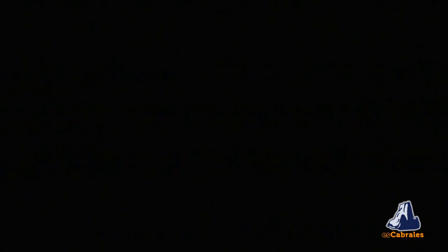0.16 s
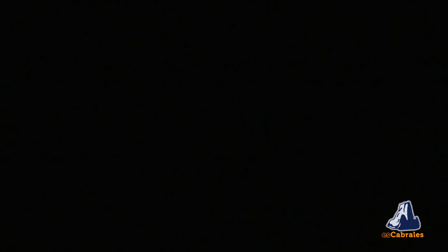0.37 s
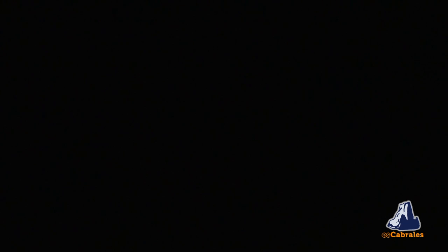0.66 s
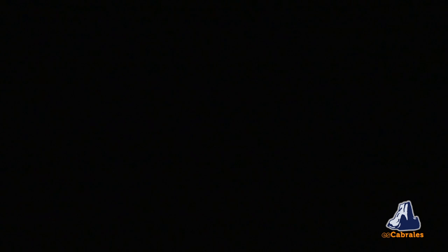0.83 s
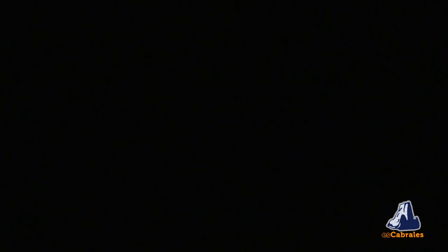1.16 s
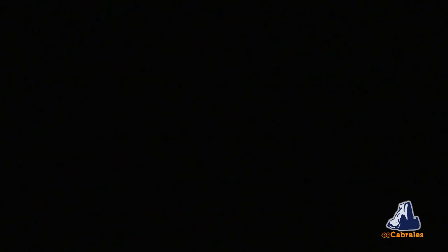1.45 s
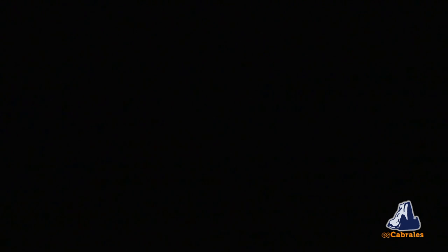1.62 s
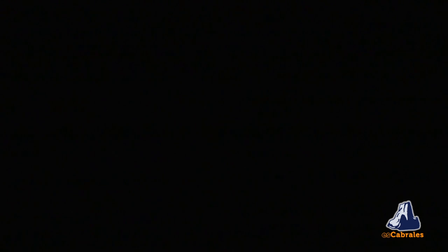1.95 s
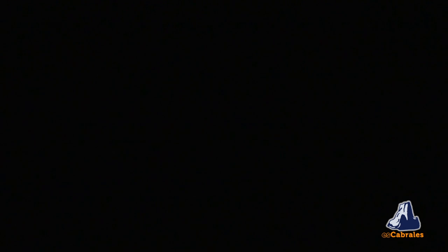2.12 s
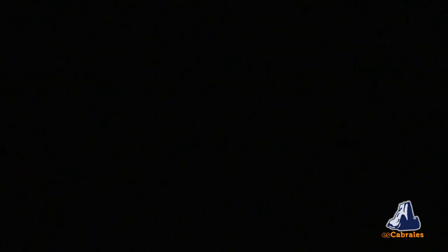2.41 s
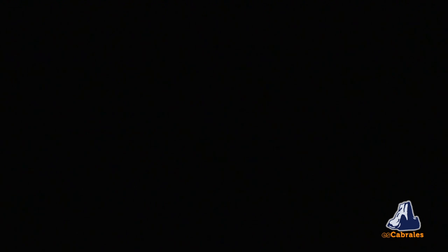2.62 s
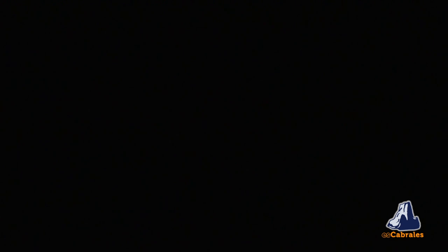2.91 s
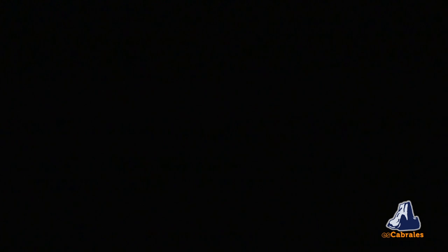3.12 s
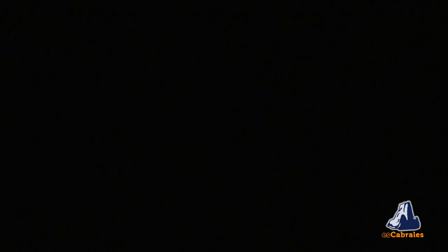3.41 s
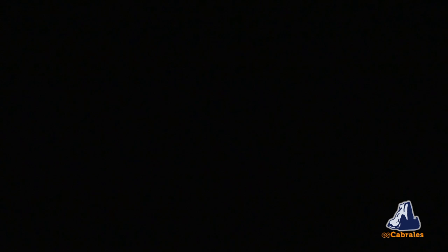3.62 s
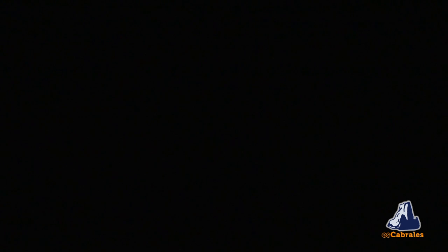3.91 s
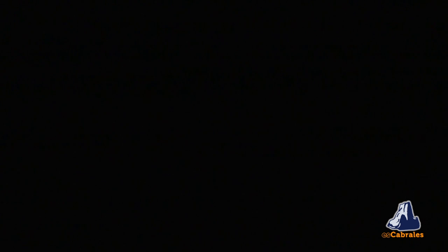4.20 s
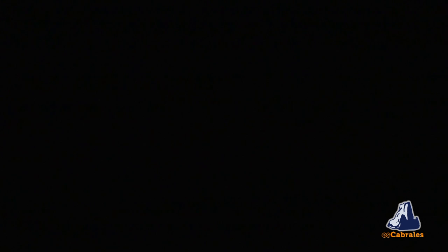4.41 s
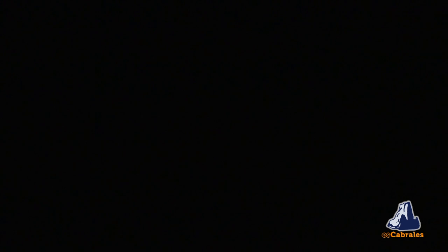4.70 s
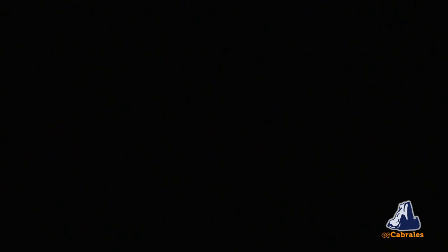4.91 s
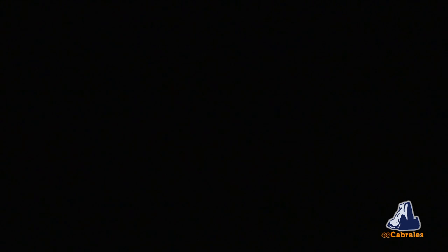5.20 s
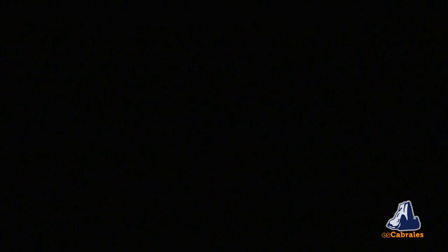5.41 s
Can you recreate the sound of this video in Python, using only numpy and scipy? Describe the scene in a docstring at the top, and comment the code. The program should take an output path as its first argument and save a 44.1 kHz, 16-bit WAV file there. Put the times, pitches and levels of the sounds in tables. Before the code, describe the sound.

Night storm in a yard: rolling distant thunder, then stronger booming thunderclaps over light pattering rain, small plops and faint squeaks.

```python
"""In a yard in steady rain, thunder rolls: a far rumble dies away, then loud claps break and keep rolling.
The rain is a shaped noise wash plus a patter of random clicks with short sprays; big drops splash as
noise bursts or plop as ringing bubbles, and a small animal squeaks faintly as thin, sliding sines.
The thunder is clusters of small shocks swelling in surges, with N-shaped pressure waves for the claps.
The right microphone channel is much louder than the left and hisses in the top treble."""
import sys
import numpy as np
from scipy import signal
from scipy.fft import rfft, irfft
from scipy.io import wavfile
from scipy.ndimage import uniform_filter1d

SR = 44100
rng = np.random.default_rng(int(sys.argv[2]) if len(sys.argv) > 2 else 0)


def inscribe(sig):
    """Save sig as 16-bit PCM at rate SR to the path in sys.argv[1].

    A 1-D sig is mono; a 2-D sig holds one channel per row.
    Samples are clipped to [-1, 1] before scaling.
    """
    pcm = np.round(np.clip(np.atleast_2d(sig).T, -1, 1) * 32767)
    wavfile.write(sys.argv[1], SR, pcm.astype(np.int16))


N = 244755
TIME = np.arange(N) / SR
FREQS = np.fft.rfftfreq(N, 1 / SR)


def gain_of(db):
    """Decibels to amplitude."""
    return 10 ** (np.asarray(db) / 20)


def evened(x):
    """Scales a sound to rms 1."""
    return x / np.sqrt(np.mean(x ** 2) + 1e-20)


def read(points, hz=FREQS):
    """Reads a table of points on a log-frequency axis."""
    f, value = np.transpose(points)
    return np.interp(np.log(hz + 1), np.log(f + 1), value)


def add(mix, s, sound):
    """Mixes a sound of several channels in at time s."""
    part = mix[:, max(round(s * SR), 0):][:, :sound.shape[1]]
    part += sound[:, :part.shape[1]]


def white():
    """Spectrum of fresh white noise."""
    return rfft(rng.standard_normal(N))


def wander(size):
    """Slow random drift of rms 1: noise smoothed twice over size samples."""
    once = uniform_filter1d(rng.standard_normal(N), size, mode="wrap")
    return evened(uniform_filter1d(once, size, mode="wrap"))


def scatter(per_s, spread_db):
    """Clicks of either sign at random moments, most small and a few large."""
    hit = rng.random(N) < per_s / SR
    sign = rng.choice([-1, 1], N)
    size_db = spread_db * np.minimum(rng.exponential(1, N), 4)
    return evened(hit * sign * gain_of(size_db))


def below(edge_hz):
    """Gain of a steep low-pass."""
    return 1 / (1 + (FREQS / edge_hz) ** 12)


def pair(near, other, same, balance, phase=0):
    """Left and right spectra: the left shares only a part of what the right hears."""
    likeness = np.clip(read(same), -1, 1)
    left = likeness * near * np.exp(1j * phase) + np.sqrt(1 - likeness ** 2) * other
    return np.array([left * gain_of(read(balance)), near])


def reflected(sound, wet, t60=0.079):
    """The direct sound and a short tail from nearby walls, different in each channel."""
    t = TIME[:4000]
    tail = rng.standard_normal((2, len(t))) * gain_of(-60 * t / t60)
    tail *= wet / np.linalg.norm(tail[0])
    tail[:, 0] = 1
    return signal.fftconvolve(sound[None], tail, axes=1)


# Colour of the distant rain's wash. Each row: frequency in Hz, relative level per Hz in dB.
WASH_COLOUR = [(30, 13), (300, 20), (900, 6.5), (1500, -0.5), (2100, -4), (3200, -6.5), (5000, -8.5),
               (7000, -9), (9000, -14.5), (12000, -21), (15500, -26)]
# Stereo tilt of the rain. Each row: frequency in Hz, left minus right in dB.
RAIN_BALANCE = [(300, -27), (1200, -3), (2200, -1.5), (3200, -1.5), (6000, -6.5), (9000, -5), (15000, -10)]
# How alike the rain is in both channels. Each row: frequency in Hz, likeness from 0 to 1.
RAIN_LIKENESS = [(300, 0.64), (1500, 0.23), (4000, 0.26), (9000, 0.24)]
RAIN_DB = -57.5  # the level the whole shower hovers around


def rain(wash_db=0, patter_db=-8, patter_hz=5800, tail_db=-21, tail_t60=0.063, swell_db=0.54):
    """A smooth wash of far drops, and the patter of nearer ones, each with a short spray."""
    wash = pair(white(), white(), RAIN_LIKENESS, RAIN_BALANCE) * gain_of(read(WASH_COLOUR))
    # the band from 2500 to 6500 Hz sets the level of the wash
    wash /= irfft(wash.mean(0) * (below(6500) - below(2500)), N).std()
    t = TIME[:2000]
    drops = np.zeros((2, len(FREQS)), complex)
    # leaves, soil and puddles each answer in a range of their own
    for centre_hz in patter_hz * np.geomspace(.5, 1.5, num=6):
        spray = gain_of(tail_db - 60 * t / tail_t60) * rng.standard_normal((2, len(t)))
        spray[:, 0] = 1  # the hit itself
        clicks = [rfft(scatter(per_s=30, spread_db=3.5)) for _ in range(2)]
        hits = pair(*clicks, RAIN_LIKENESS, RAIN_BALANCE)
        answer = np.exp(-(np.log((FREQS + 1) / centre_hz) / .27) ** 2)
        drops += hits * rfft(spray, N) * answer
    level = gain_of(RAIN_DB + swell_db * wander(size=3500))  # the fall thickens and thins
    patter = evened(irfft(drops, N))
    return level * (gain_of(wash_db) * irfft(wash, N) + gain_of(patter_db) * patter)


# Thin squeaks. Each row: start in seconds, length in seconds, pitch at the start in Hz,
# in the middle in Hz, at the end in Hz, level in dB.
SQUEAK_CALLS = [(2.095, .04, 7450, 7350, 7300, -54), (4.427, .055, 6900, 7100, 7300, -54),
                (4.540, .048, 8600, 9050, 8600, -54), (4.660, .068, 9050, 9380, 8600, -55),
                (4.817, 0.13, 7370, 7340, 7200, -51.5), (4.99, 0.041, 8550, 8600, 8850, -56),
                (5.043, .022, 9700, 9950, 10250, -53.5), (5.083, 0.055, 10150, 9900, 9100, -53),
                (5.124, .042, 8450, 8000, 7300, -57)]


def squeaks(left_db=-10, waver=0.0086, flutter_db=3, wet=0.54):
    """Thin, unsteady whistles, each sliding along one arch of pitch."""
    out = np.zeros((2, N))
    for s, length, start_hz, middle_hz, end_hz, db in SQUEAK_CALLS:
        u = np.linspace(0, 1, int(length * SR))
        arch = np.polyfit([0, .5, 1], [start_hz, middle_hz, end_hz], 2)
        hz = np.polyval(arch, u)
        hz *= 1 + waver * wander(size=100)[:len(u)]
        flutter = gain_of(flutter_db * wander(size=200)[:len(u)])
        strength = signal.windows.tukey(len(u), .5) * flutter
        whistle = np.sin(2 * np.pi * np.cumsum(hz) / SR) * strength
        add(out, s, gain_of(db) * gain_of([[left_db], [0]]) * reflected(whistle, wet))
    return out


# Drops that plop into standing water. Each row: start in seconds, pitch in Hz, level in dB.
PLOP_DROPS = [(0.751, 1700, -38.5), (1.993, 1730, -41), (3.232, 1700, -45), (4.461, 1720, -39),
              (5.288, 1670, -44)]


def plops(left_db=-8, glide=0.32, wet=1.0):
    """A trapped bubble rings for a moment, rising slightly in pitch, blurred by reflections."""
    out, t = np.zeros((2, N)), TIME[:5000]
    t60 = .08  # ring time of the bubble in seconds
    for s, hz, db in PLOP_DROPS:
        onset = 1 - np.exp(-t / 0.00046)
        ring = np.sin(2 * np.pi * hz * (t + glide * t ** 2))
        bubble = ring * onset * gain_of(db - 60 * t / t60)
        add(out, s, gain_of([[left_db], [0]]) * reflected(bubble, wet))
    return out


# smaller splashes land at random, with a spread of strength and colour
SMALL_DB, SMALL_SPREAD_DB = -49.5, 2.5
SMALL_HZ, SMALL_SPREAD_OCTAVES, SMALL_WIDTH = 5800, 0.49, .58  # width in natural log of frequency


def small_splashes(count=24):
    """Rows like those of the big splashes, strewn by chance over the whole shower."""
    when, strength, colour = rng.uniform(-1, 1, (count, 3)).T
    s = (np.arange(count) + (when + 1) / 2) * N / SR / count
    db = SMALL_DB + SMALL_SPREAD_DB * strength
    centre_hz = SMALL_HZ * 2 ** (SMALL_SPREAD_OCTAVES * colour)
    return list(zip(s, db, centre_hz, np.full(count, SMALL_WIDTH)))


# Big splashes close by. Each row: start in seconds, level in dB, centre of the spray in Hz,
# its width in natural log of frequency.
BIG_SPLASHES = [(0.047, -42, 7160, 0.42), (0.163, -43, 5440, 0.25), (0.207, -46, 6930, .5),
                (0.326, -46, 4750, 0.42), (0.841, -45.5, 7310, .56), (0.997, -43, 5500, .5),
                (1.326, -42, 6600, .6), (1.338, -43, 6800, .7), (1.641, -43.5, 6410, .46),
                (1.9895, -40, 6800, 0.28), (2.467, -46, 3710, .9), (2.682, -45, 5500, .5),
                (3.021, -45.5, 7080, .5), (3.514, -44.5, 5400, .5), (3.602, -46, 4190, 0.96),
                (3.925, -42, 8600, 0.61), (4.359, -46, 4550, 0.74), (4.976, -40, 6400, 0.74),
                (5.284, -45.5, 5740, 0.62)]


def splashes(left_db=-7, tail_db=-14, tail_s=0.021, grain_db=1.0, ring_db=3.0, sheen_db=-8, top_hz=14500):
    """A drop bursts into a brief spray of droplets, coloured by the spot where it lands."""
    out, t = np.zeros((2, N)), TIME[:4096]
    hz = np.fft.rfftfreq(len(t), 1 / SR)
    peak_s = .006
    # the crown bursts, then its droplets fall back
    burst = t / peak_s * np.exp(1 - t / peak_s)
    fallback = gain_of(tail_db) * t / tail_s * np.exp(1 - t / tail_s)
    shape = np.sqrt(burst ** 2 + fallback ** 2)
    for s, db, centre_hz, width in BIG_SPLASHES + small_splashes():
        fizz = rng.standard_normal((2, len(t)))
        fizz[0] += .5 * fizz[1]  # the left shares part of the right
        spot = gain_of(ring_db * evened(uniform_filter1d(rng.standard_normal(len(hz)), size=45)))
        hump = 1 / (1 + (np.log((hz + 1) / centre_hz) / width) ** 2)
        colour = spot * (hump + gain_of(sheen_db)) / (1 + (hz / top_hz) ** 10)
        grain = evened(uniform_filter1d(rng.standard_normal(len(t)), size=70))
        spray = irfft(rfft(fizz) * colour) * gain_of(grain_db * grain) * shape
        spray *= np.linalg.norm(shape) / np.linalg.norm(spray[1])  # the drop's size alone sets the energy
        add(out, s, gain_of(db) * gain_of([[left_db], [0]]) * spray)
    return out


# Stereo tilt of the thunder. Each row: frequency in Hz, left minus right in dB.
PEAL_BALANCE = [(60, -17), (110, -28), (200, -18.5), (380, -15.5), (700, -9.5), (1290, -14), (2400, -15)]
# How alike the thunder is in both channels. Each row: frequency in Hz, likeness from 0 to 1.
PEAL_LIKENESS = [(25, .3), (70, 0.33), (115, 0.83), (450, 0.47), (600, 0.15), (950, 0.42), (1400, 0.46)]
# Phase of the part both channels share. Each row: frequency in Hz, lead of the left in radians.
PEAL_PHASE = [(40, -0.29), (150, -0.11), (480, -0.92), (600, 1), (950, -1.4), (1500, 0.18)]


def thunder_pair(near, other):
    """Thunder as it reaches the two channels."""
    return pair(near, other, PEAL_LIKENESS, PEAL_BALANCE, read(PEAL_PHASE))


# Surges, each from one stretch of the lightning channel. Each row: arrival in seconds, level in dB,
# hold in seconds, depth in dB (more boom and less edge).
CHANNEL_SURGES = [(.25, -35.5, 0.073, 3), (0.496, -36.5, 0.017, -4.5), (.73, -38, 0.17, -9),
                  (0.902, -32, 0.25, -7), (1.389, -29.5, .04, -3.5), (2.326, -35.5, 0.13, 14.5),
                  (2.499, -20, 0.06, 1.5), (2.575, -18, 0.12, 0.5), (2.703, -22.5, 0.11, 3),
                  (2.884, -30, .02, 10), (3.124, -31.5, 0.16, 0.5), (3.39, -29, .01, 1),
                  (3.548, -20, 0.042, 2.5), (3.654, -29, 0.017, 7), (3.939, -30, 0.11, -.5),
                  (4.197, -29, .06, 2), (4.288, -25.5, .2, 1), (4.565, -31.5, 0.14, -0.5),
                  (4.787, -30.5, 0.11, -2.5), (5.124, -32, 0.052, 0.5), (5.469, -26, .1, 11.5)]
# How a surge sounds in the boom, body, roar and crackling edge. Each row: level in dB,
# fall in dB per second, dB gained per dB of depth.
SURGE_REGISTERS = [(-4, 176, 1), (0.5, 82, 0), (-5, 35.5, -0.81), (-16.5, 46, -.94)]
SURGE_RISE_S = 0.035


def surge_power():
    """Power in each register: a surge rises, holds and dies away, its boom fastest and its roar slowest."""
    level_db, fall_db_per_s, depth_share = np.transpose(SURGE_REGISTERS)[:, :, None]
    power, t = np.zeros((len(SURGE_REGISTERS), N)), TIME[:SR]
    rise = np.minimum(t / SURGE_RISE_S, 1)
    for s, db, hold_s, depth_db in CHANNEL_SURGES:
        fall_db = fall_db_per_s * np.maximum(t - SURGE_RISE_S - hold_s, 0)
        strength = rise * gain_of(db + level_db + depth_share * depth_db - fall_db)
        add(power, s, strength ** 2)
    return power


# Resonances of the yard that colour every peal. Each row: frequency in Hz, width in Hz, lift in dB.
YARD_RESONANCES = [(162, 16, 2), (222, 13, 2), (258, 17, -0.5), (287.5, 25, 6.5), (303, 12, -1),
                   (330, 18, 0), (421.2, 7.9, 5.5), (538.6, 57, 3.5), (963, 20, 6), (1070, 13, 8)]


def peal(rumble, surges, colour, per_s, boom_db, body_db, roar_db, edge_db, spread_db=1.0, lumps_db=0.9):
    """Countless small shocks from along the lightning channel, dulled by the air and coloured by the yard."""
    colour_db = read(colour)
    for hz, width, lift_db in YARD_RESONANCES:
        colour_db = colour_db + lift_db / (1 + (2 * (FREQS - hz) / width) ** 2)
    clicks = [rfft(scatter(per_s, spread_db)) for _ in range(2)]
    shocks = thunder_pair(*clicks) * gain_of(colour_db)
    rumble_db = np.interp(TIME, *np.transpose(rumble))
    low, middle, high = below(edge_hz=126), below(edge_hz=356), below(edge_hz=641)
    registers = [(low, boom_db), (middle - low, body_db), (high - middle, roar_db), (1 - high, edge_db)]
    out = np.zeros((2, N))
    # in each register the surges ride on the rumble
    for (band, level_db), surge in zip(registers, surges):
        sound = irfft(shocks * band, N)
        strength = np.sqrt(uniform_filter1d(sound.mean(0) ** 2, size=5500) + 1e-20)
        out += sound / strength * np.sqrt(gain_of(rumble_db + level_db) ** 2 + surge)
    return out * gain_of(lumps_db * wander(size=1800))  # the shocks arrive in clumps


# Rumble under the surges of the far peal, dying away at its end. Each row: time in seconds, level in dB.
FAR_BED = [(0, -42), (.1, -38.5), (.23, -33.5), (1.54, -35.5), (1.98, -44.5), (2.33, -45)]
# Rumble under the surges of the near peal, swelling to its strongest near 2.94 s.
# Each row: time in seconds, level in dB.
NEAR_BED = [(2.33, -42), (2.59, -29), (2.94, -23.5), (3.14, -31), (4.6, -33), (5.55, -33)]
# Colour of the far peal. Each row: frequency in Hz, relative level per Hz in dB.
FAR_TONE = [(15, -52), (30, -8), (44, 0.5), (90, -1), (150, 2), (240, 1), (330, -8), (420, -0.5),
            (500, -8.5), (610, -7.5), (670, -14.5), (800, -12.5), (1100, -13.5), (1400, -20.5),
            (1900, -35.5), (2800, -54), (5000, -85)]
# Colour of the near peal. Each row: frequency in Hz, relative level per Hz in dB.
NEAR_TONE = [(15, -50), (30, -3.5), (48, 0), (110, 4), (150, -2), (200, 1.5), (285, -5), (330, -5.5),
             (540, -8.5), (620, -16), (850, -22.5), (1300, -36), (1800, -48.5), (3500, -86)]
HANDOVER_S = 2.338  # the near peal covers the far one from here on


def roll():
    """A far rumble dies away, then a nearer, heavier peal covers it; both swell with the surges."""
    surges = surge_power()
    far = peal(FAR_BED, surges, FAR_TONE, per_s=3000,
               boom_db=0.0, body_db=-0.7, roar_db=-6.0, edge_db=-7.0)
    near = peal(NEAR_BED, surges, NEAR_TONE, per_s=1600,
                boom_db=-1.0, body_db=-0.15, roar_db=-10.5, edge_db=-12.0)
    turn = np.pi / 2 * np.clip((TIME - HANDOVER_S) / 0.02 + .5, 0, 1)
    return np.cos(turn) * far + np.sin(turn) * near


# Shock fronts that open the claps. Each row: start in seconds, level in dB before the passband,
# length in seconds, decay of the echoes by 60 dB in seconds.
CLAP_FRONTS = [(2.347, -14, 0.022, 0.46), (2.523, -4.5, 0.012, 0.25), (2.707, -8, 0.0046, 0.18),
               (2.776, -4, 0.0059, 0.17), (3.373, -15, 0.015, 0.17), (3.56, -9, 0.0061, 0.27),
               (5.506, -7, 0.011, 0.33)]


def claps(echo_db=-9):
    """Each clap opens with an N-shaped pressure wave, trailed by a cluster of its echoes."""
    fronts, t = np.zeros((2, N)), TIME[:SR // 2]
    for s, db, length, t60 in CLAP_FRONTS:
        wave = np.linspace(1, -1, int(length * SR))
        arrivals = rng.random((2, len(t))) < 220 / SR  # about 220 echoes a second
        echoes = arrivals * rng.standard_normal((2, len(t))) * gain_of(echo_db - 60 * t / t60)
        echoes[:, 0] = 1  # the front itself
        add(fronts, s, gain_of(db) * signal.fftconvolve(echoes, wave[None], axes=1))
    # the air rounds the front, the microphone loses its deepest part
    passband = signal.butter(3, [34, 450], "bandpass", fs=SR, output="sos")
    return irfft(thunder_pair(*rfft(signal.sosfilt(passband, fronts))), N)


def scene():
    """Rain, the small sounds close by, and the thunder over them."""
    return rain() + squeaks() + plops() + splashes() + roll() + claps()


# Faint high noise in the left channel, strongest near 10.8 kHz.
# Each row: frequency in Hz, relative level per Hz in dB.
LEFT_HIGH_NOISE = [(6000, -56), (9000, -9), (10000, -3), (10800, 1), (11200, -12), (12800, -13),
                   (15000, -24), (15600, -40)]
# High hiss in the right channel, strongest from 11 to 15 kHz.
# Each row: frequency in Hz, relative level per Hz in dB.
RIGHT_HIGH_NOISE = [(6000, -28), (9300, -16), (10200, -5.5), (10750, -3.5), (11200, 4), (12000, 1),
                    (14500, 1), (15200, 0.5), (15800, -19)]
EDGE_HZ = 15850  # top of the band


def record(dry, left_noise_db=-57, right_noise_db=-44):
    """The loudest peaks are rounded off, high noise joins each channel, then comes the band limit."""
    noise = []
    for colour, db in [(LEFT_HIGH_NOISE, left_noise_db), (RIGHT_HIGH_NOISE, right_noise_db)]:
        noise.append(gain_of(db) * evened(irfft(white() * gain_of(read(colour)), N)))
    rounded = dry / (1 + dry ** 4) ** (1 / 4)
    band_limit = signal.firwin(511, EDGE_HZ, window=("kaiser", 9), fs=SR)
    return signal.oaconvolve(rounded + noise, band_limit[None], "same")


dry = scene()
out = record(dry)
inscribe(out)
```